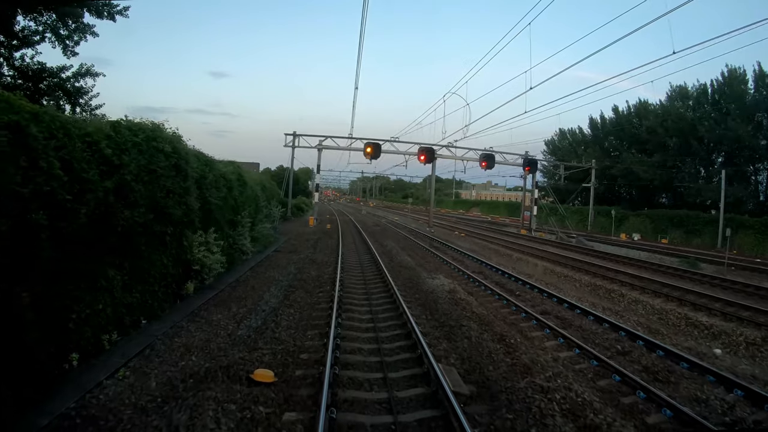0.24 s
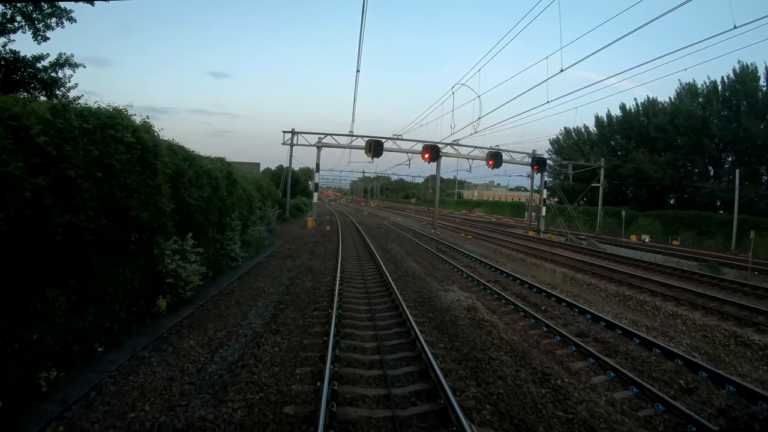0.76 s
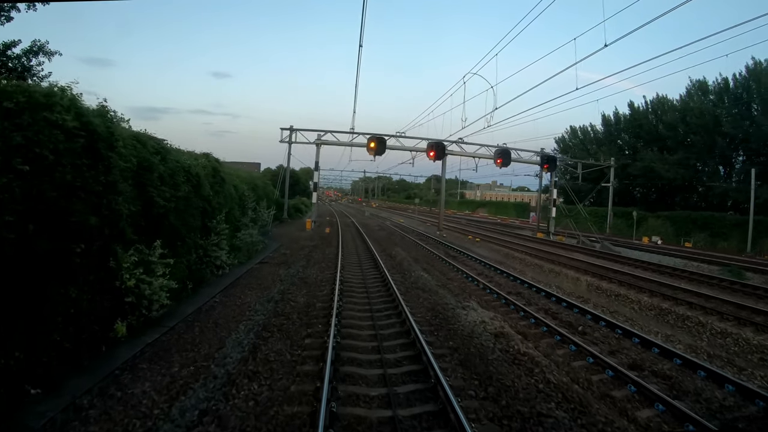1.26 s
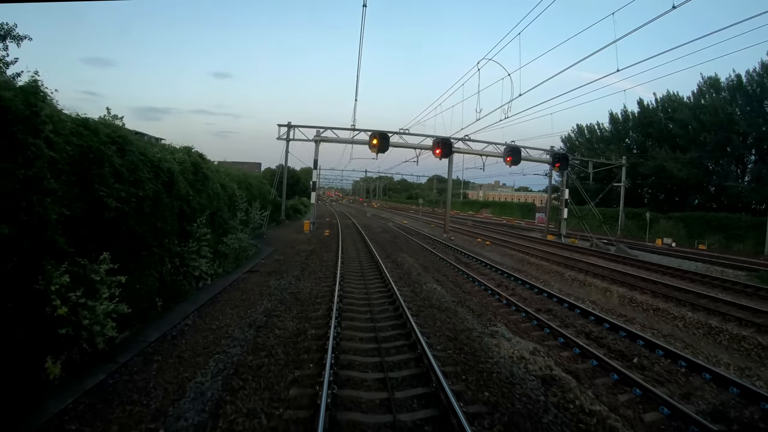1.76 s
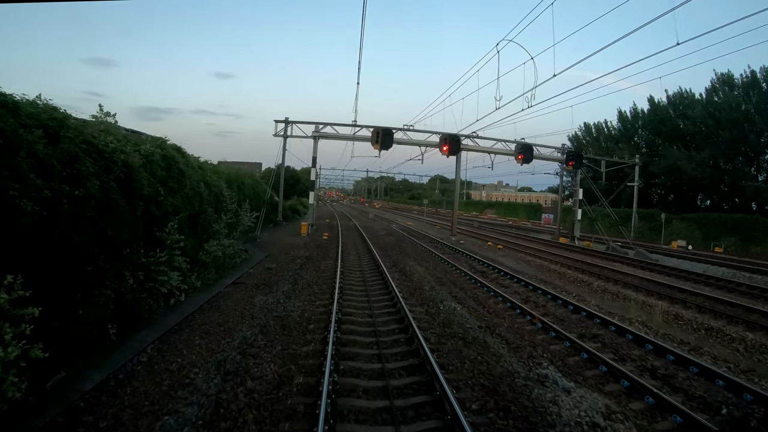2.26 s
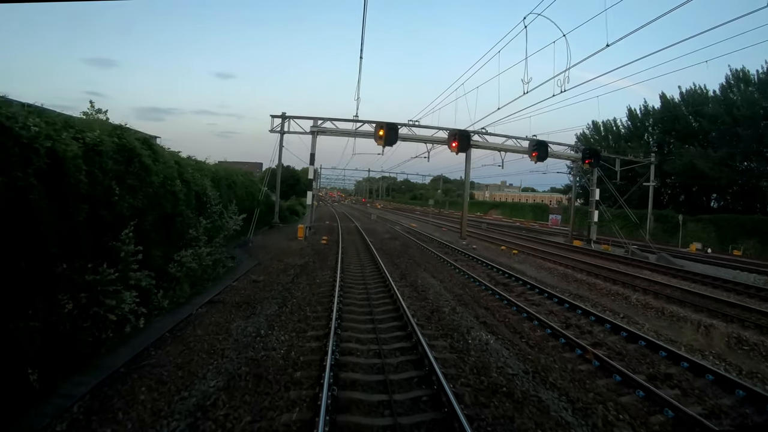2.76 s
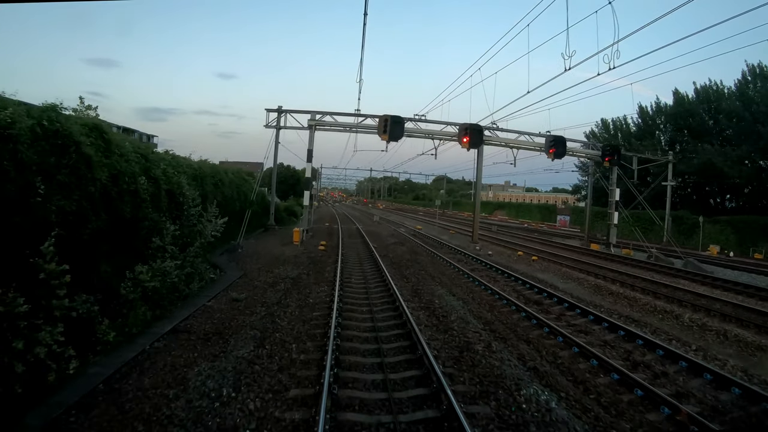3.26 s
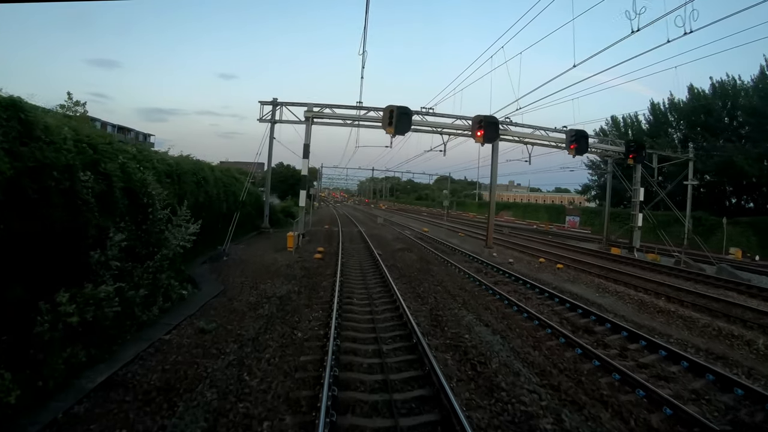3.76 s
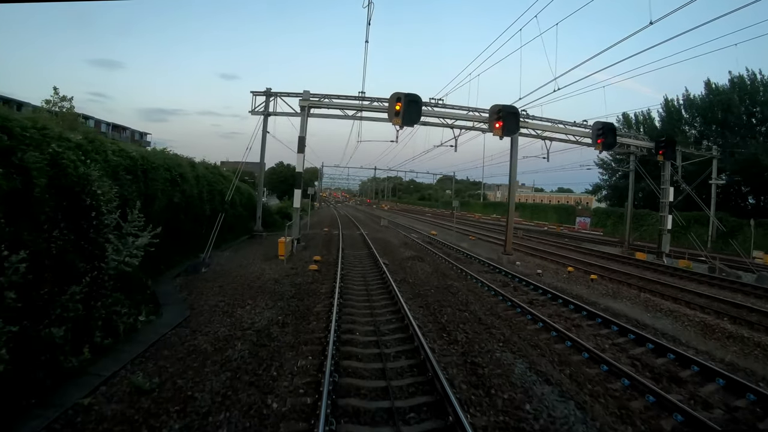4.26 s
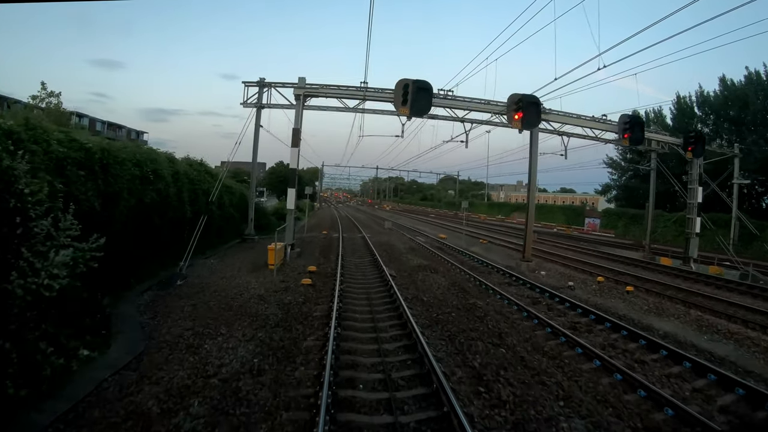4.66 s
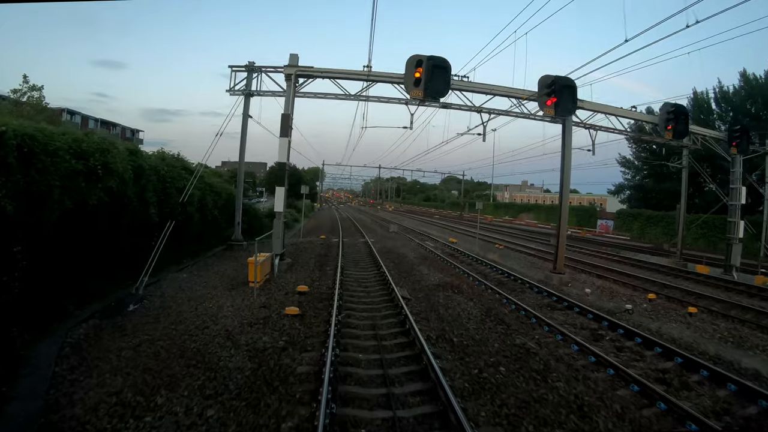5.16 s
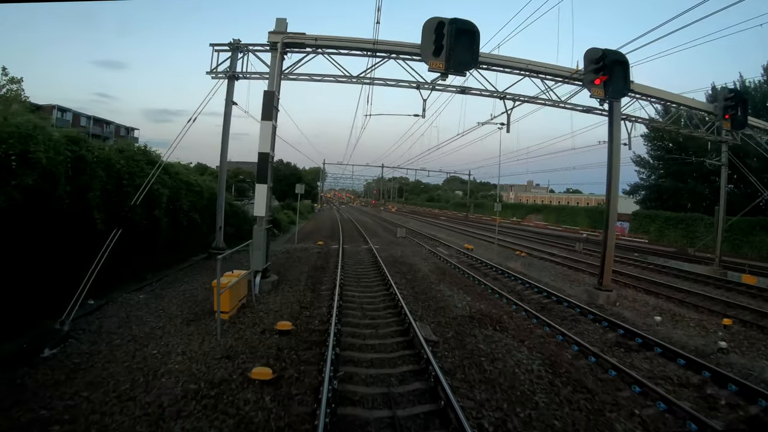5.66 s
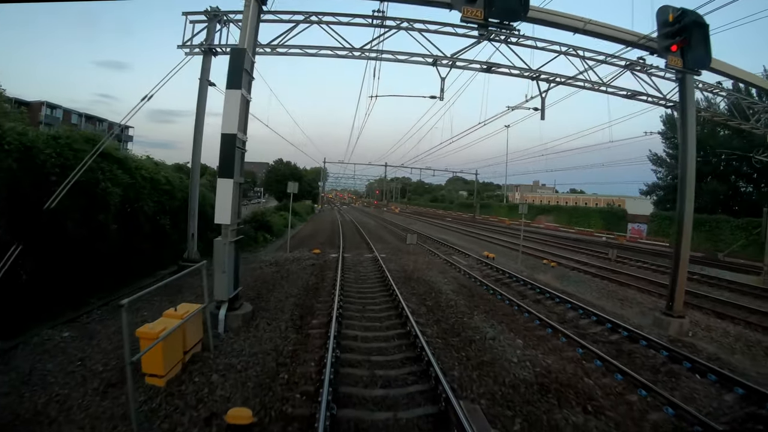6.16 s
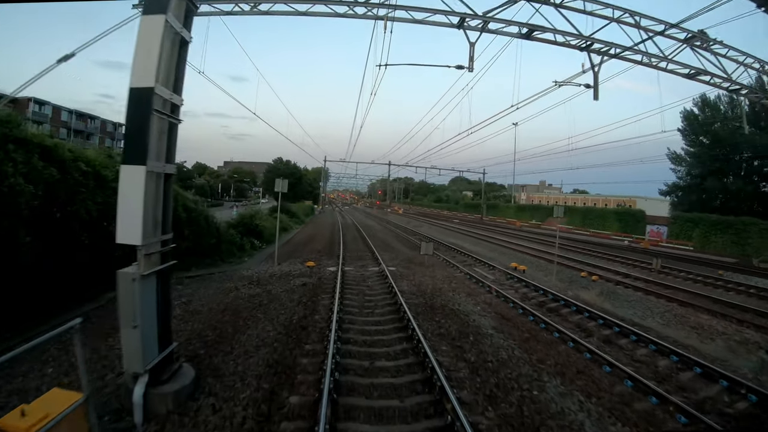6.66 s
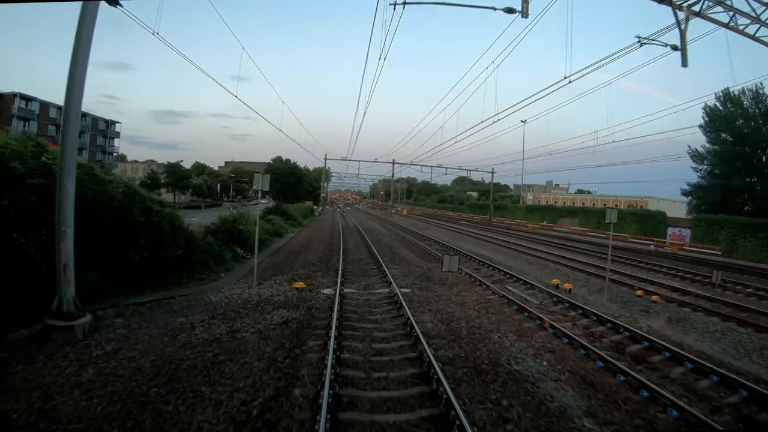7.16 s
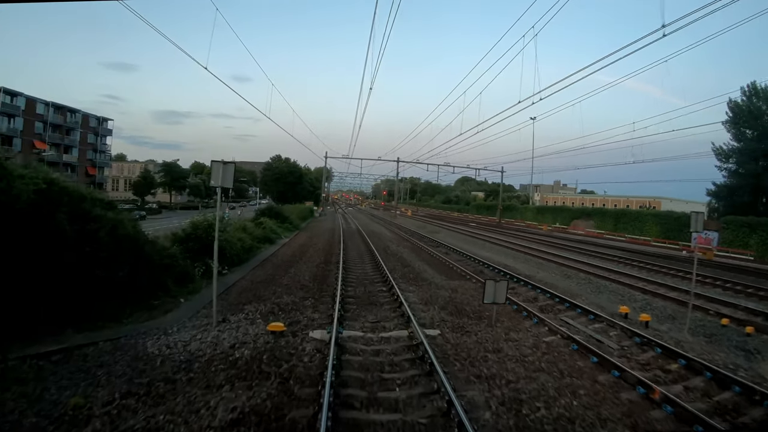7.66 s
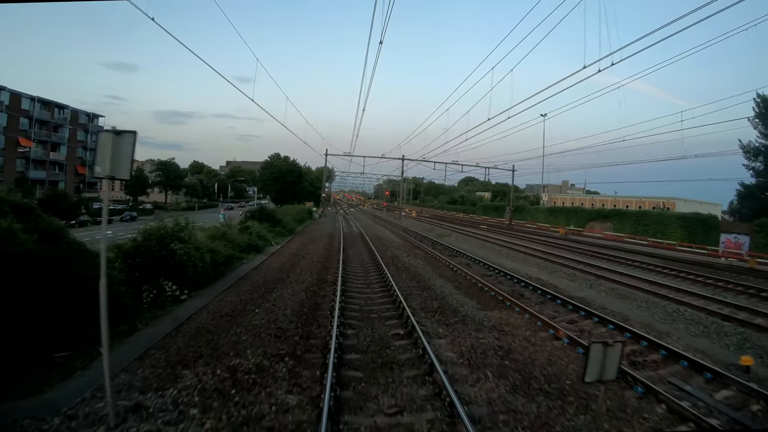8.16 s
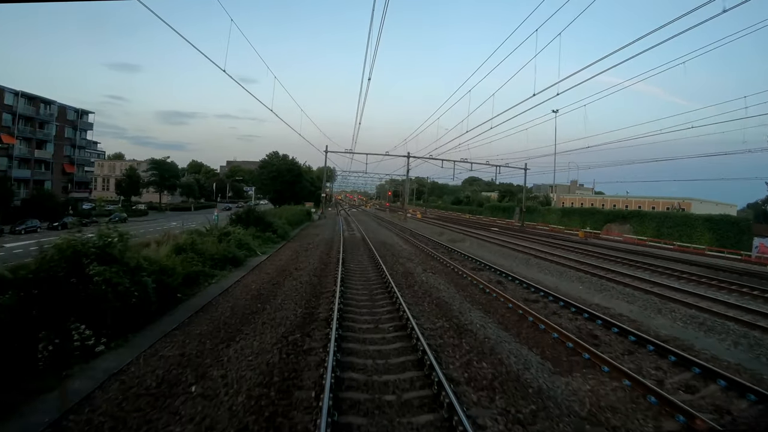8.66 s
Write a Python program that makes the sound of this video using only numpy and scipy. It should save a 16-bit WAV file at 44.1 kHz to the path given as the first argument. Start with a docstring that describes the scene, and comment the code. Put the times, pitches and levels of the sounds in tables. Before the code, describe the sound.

A close stereo microphone in a train driver's cab catches low rumbling through the floor as speed slowly builds. A metallic lever scrapes, clacks hard twice with a brief springy ring, and ticks through four notches. Then only rolling remains: throbbing bass surges, droning panels, a faint rising whine, a few dull knocks and tiny bright ticks over gently growing rail hiss.

```python
"""Inside the cab of a train that slowly gathers speed: from the start wheels rumble through the floor
(coloured noise), the car body booms (a wavering sine) and panels and floor drone (narrow-band noise).
In the first second a control lever slides and is thrown twice (dense impacts through ringing modes); it
then clicks over four notches (single impacts), and the small cab answers each. Later gears whine faintly
on climbing tones, rail joints knock, faint bright ticks sound, and the rail hiss has grown by the end."""
import sys
import numpy as np
from scipy import signal
from scipy.fft import rfft, irfft
from scipy.io import wavfile
from scipy.ndimage import uniform_filter1d

SR = 44100
rng = np.random.default_rng(int(sys.argv[2]) if len(sys.argv) > 2 else 0)


def dump(signal):
    """Clip the signal to [-1, 1] and save it as 16-bit WAV at the path in sys.argv[1]."""
    limited = np.clip(np.atleast_2d(signal).T, -1, 1)
    pcm = np.round(limited * 32767).astype(np.int16)
    wavfile.write(sys.argv[1], SR, pcm)


N = 393372


def undb(db):
    """Decibel law: level in dB to amplitude gain."""
    return 10 ** (np.asarray(db) / 20)


def curve(rows, column=1):
    """Linear interpolation: one column of a table over time."""
    rows = np.asarray(rows, float)
    return np.interp(np.arange(N) / SR, rows[:, 0], rows[:, column])


def on_hz(table, size):
    """Spectral envelope: (frequency, level) points joined over log frequency at every bin."""
    hz, db = np.transpose(table)
    bins_hz = np.fft.rfftfreq(size, 1 / SR)
    return np.interp(np.log(bins_hz + 1), np.log(hz), db)


def walk(rate):
    """Random modulation: levels held 1 / rate s and smoothed twice, standard deviation 1."""
    step = 32  # samples between computed points
    hold = int(SR / rate / step)
    levels = np.repeat(rng.standard_normal(N // step // hold + 2), hold)
    levels = uniform_filter1d(uniform_filter1d(levels, hold), hold)
    return np.interp(np.arange(N) / step, np.arange(len(levels)), levels / np.std(levels))


def swell(start_s, length_s):
    """Raised-cosine envelope: a smooth rise and fall, peak 1, half height for half its length."""
    return np.sin(np.pi * np.clip((np.arange(N) / SR - start_s) / length_s, 0, 1)) ** 2


def fade(t60, seconds=1.):
    """Exponential decay: damping takes away 60 dB in t60 seconds."""
    return np.exp(-np.log(1000) * np.arange(int(seconds * SR)) / SR / t60)


# Diffuse field at two close ports: frequency_hz, side_minus_mid_db
PORT_WIDTH = [(60, -15.5), (110, -24), (190, -20), (330, -10), (580, -5.5), (1020, 1), (1800, -2),
              (3180, -4.5), (5610, -0.5), (9900, -0.5)]
# Balance of the two ports: frequency_hz, left_minus_right_db
PORT_LEAN = [(60, 0), (110, 0.0), (190, 0.0), (330, 0.5), (580, 2), (1020, -1), (1800, -1.5), (3180, 0),
             (5610, -0.5), (9900, -1)]


def diffuse(colour, size=N):
    """Diffuse field: coloured noise, mid rms 1, with ports alike in the bass and unlike in the treble."""
    mid, side = rfft(rng.standard_normal((2, size))) * undb(on_hz(colour, size))
    side = side * undb(on_hz(PORT_WIDTH, size))
    lean = undb(on_hz(PORT_LEAN, size) / 2)
    pair = irfft(np.array([(mid + side) * lean, (mid - side) / lean]), size)
    return pair / np.std(pair.mean(axis=0))


def narrow(hz, width, rough=1e3):
    """Narrow-band noise: a carrier with a random complex envelope, mid rms about 1, ports drifting in phase."""
    wobble = (1 + rough * (walk(width) + 1j * walk(width))) / np.sqrt(1 + 2 * rough ** 2)
    carrier = np.exp(2j * np.pi * np.cumsum(hz * np.ones(N)) / SR)
    band = np.sqrt(2) * wobble * carrier
    difference = min(np.mean(hz) / 1100, 1) * walk(9) * band.imag
    return band.real + np.array([[1], [-1]]) * difference


def tone(hz, gain):
    """Phase integration: a sine on a moving pitch; gain is its rms."""
    return np.sqrt(2) * gain * np.sin(2 * np.pi * np.cumsum(hz) / SR)


def ring(modes, bend=0., settle_s=1., spread=1.6):
    """Modal synthesis: decaying sines, each with its own phase at each port; the pitch may start sharp."""
    t = np.arange(SR) / SR
    t = t + bend * settle_s * (1 - np.exp(-t / settle_s))
    response = 0
    for hz, db, t60 in modes:
        phase = rng.uniform(0, 2 * np.pi) + rng.uniform(0, spread, (2, 1))
        response = response + undb(db) * fade(t60) * np.sin(2 * np.pi * hz * t + phase)
    return response


def echo(colour, t60, rise_s):
    """Reverberation: the cab answers one impact with diffuse sound that builds up and dies."""
    half = SR // 2
    envelope = fade(t60) * (1 - fade(rise_s * np.log(1000)))  # rise_s is a time constant
    tail = diffuse(colour, size=half) * envelope[:half]
    return np.pad(tail, ((0, 0), (0, SR - half)))


def hits(events):
    """Impulsive excitation: one single-sample force for each (start_s, level_db)."""
    force = np.zeros(N)
    for s, db in events:
        force[int(s * SR)] = undb(db)
    return force


def play(force, response):
    """Linear superposition: a force convolved with an impulse response."""
    first, last = np.flatnonzero(force)[[0, -1]]
    sound = signal.fftconvolve(force[None, first:last + 1], response, axes=1)[:, :N - first]
    return np.pad(sound, ((0, 0), (first, N - first - sound.shape[1])))


# Lever rattle, a slide and then two throws, each a list of: time_s, force_level_db
LEVER_RATTLE = [
    [(0, -81), (.115, -75), (.135, -64), (.16, -70.5), (.2, -70), (.30, -70.5)],
    [(.303, -66.5), (.311, -47), (.32, -46), (.335, -41), (.355, -32.5), (.375, -40), (.43, -54.5),
     (.47, -65.5), (.6, -92)],
    [(.614, -59), (.619, -41), (.626, -31), (.645, -33), (.658, -39.5), (.671, -40.5), (.677, -37),
     (.684, -36), (.697, -34), (.712, -46), (.74, -48), (.78, -60.5), (.83, -73.5), (.98, -82)],
]
# Cab colour for the slide and each throw: frequency_hz, relative_level_db_per_hz
LEVER_COLOUR = [
    [(400, -2), (700, -4), (1300, -11), (2700, -19.5), (4500, -33), (7500, -33), (10000, -43), (12000, -69)],
    [(150, -2), (300, 1), (450, -14), (570, -1), (690, -3.5), (830, -10.5), (940, -5), (1030, -9),
     (1150, -17), (1550, -10), (2400, -13.5), (3000, -16.5), (3900, -24.5), (4800, -35.5), (7100, -25),
     (10300, -42.5), (10900, -51.5), (15000, -68)],
    [(180, -25), (390, 2), (510, -5.5), (660, 2), (780, -8.5), (1000, -2.5), (1350, -6.5), (1620, -3.5),
     (2350, -3.5), (3000, -9), (3900, -17), (4800, -28.5), (7600, -27), (10300, -39.5), (10900, -58),
     (15000, -57)],
]
# Modes of the lever and desk plate: frequency_hz, relative_level_db, t60_s
LEVER_MODES = [(395, -24, .2), (668, -20, 0.2), (889, -25, 0.2), (1005, -24, 0.16), (1210, -25, 0.34),
               (1360, -22, 0.25), (1730, -22, 0.19), (2325, -21, 0.2), (2407, -22, .2), (2550, -30, 0.27),
               (2843, -23, 0.2), (3180, -29, .25), (1935, -22, .24), (3870, -30, .2), (5790, -36, .2)]
# Modes of the lever spring: frequency_hz, level_db, t60_s
SPRING_MODES = [(1215, -58, 2.0), (2205, -55.5, 1.5), (2232, -61, .8), (3870, -70, .8), (4110, -78, 1.2),
                (5780, -76, .7)]
# Lever spring: struck_s, stopped_s
SPRING_TIMES = (.37, .62)


def throws():
    """Random impact train: impacts shared at random among several cab echoes, all ringing one set of modes."""
    echoes, impacts_per_s, cab_t60_s = 6, 4500, 0.15
    t, out, modes = np.arange(N) / SR, 0, ring(LEVER_MODES)
    for rows, colour, ring_db in zip(LEVER_RATTLE, LEVER_COLOUR, (-20, -3, 4)):
        chance = rng.random((3, N))
        rattle = (chance[0] < impacts_per_s / SR) * (2 * chance[1] - 1)
        force = rattle * (t > rows[0][0]) * (t < rows[-1][0]) * undb(curve(rows))
        chosen_echo = (chance[2] * echoes).astype(int)
        for number in range(echoes):
            response = echo(colour, cab_t60_s, 0.00027) + undb(ring_db) * modes
            out = out + play(force * (chosen_echo == number), response)
    struck_s, stopped_s = SPRING_TIMES
    spring = play(hits([(struck_s, 0)]), ring(SPRING_MODES)) * (t < stopped_s)
    return out + spring


# Catch dropping into each notch: start_s, impact_level_db
NOTCH_HITS = [(.89, -43.5), (1.04, -40.5), (1.163, -39), (1.342, -38.5)]
# Cab colour after a notch: frequency_hz, relative_level_db_per_hz
NOTCH_CAB_COLOUR = [(500, 0), (700, 7), (950, -1), (1400, -5.5), (1750, -2), (2000, 3), (2300, 1),
                    (2550, -10), (3300, -13.5), (4600, -25), (7500, -33), (10000, -43)]
# Modes of the spring catch, before it seats: frequency_hz, relative_level_db, t60_s
CATCH_MODES = [(1728, -8.5, 0.45), (1785, -17, .2), (2050, -17, 0.1), (2280, -17, .08), (950, -18, .2),
               (1235, -22, 0.3)]


def notches():
    """Damped modal ringing: the spring catch starts sharp, slackens, and is damped as it seats."""
    free_s, sharpness, settle_s = 0.077, 0.3, 0.008  # sharpness is a fraction of the pitch
    t = np.arange(SR) / SR
    damping = undb(-1600 * np.maximum(t - free_s, 0))  # 1600 dB per s once seated
    seat = (1 - fade(0.06)) ** 2 * damping
    catch = seat * ring(CATCH_MODES, sharpness, settle_s, spread=.8)
    out = 0
    for notch in NOTCH_HITS:  # a fresh cab response for each
        cab = undb(-4.0) * echo(NOTCH_CAB_COLOUR, 0.26, 0.018)
        out = out + play(hits([notch]), cab + catch)
    return out


# Car body boom between surges: time_s, pitch_hz, level_db before random dips
BODY_BOOM = [(0.0, 67.6, -46), (0.3, 63.76, -31), (.45, 56.53, -32.5), (.7, 62, -37), (1.0, 66.8, -33.5),
             (1.3, 51, -39.5), (2.0, 51, -42), (2.8, 50.93, -34), (2.95, 67.36, -35.5), (3.5, 67.16, -33.5),
             (3.65, 56.95, -28), (4.7, 59.8, -31), (4.95, 55.94, -23.5), (5.15, 66.25, -57), (5.4, 67, -24),
             (5.7, 64.1, -31), (5.93, 69.07, -44.5), (6.3, 66, -31), (6.8, 67.97, -26.5), (7.2, 63.5, -40),
             (7.5, 63.86, -36.5), (7.9, 66.43, -33.5), (8.1, 66.64, -29.5), (8.25, 67, -34.5),
             (8.45, 68.9, -28), (8.65, 59.3, -29), (8.92, 66.3, -33)]
# Surges of the boom over rough track: centre_s, half_height_length_s, peak_rms_level_db
BOOM_SURGES = [(0.413, 0.22, -26.5), (0.715, 0.073, -21), (2.833, 0.12, -28.5), (4.324, 0.049, -23.5),
               (4.448, 0.08, -28), (4.58, 0.05, -26), (4.746, 0.066, -25), (5.026, 0.074, -20),
               (5.384, 0.071, -26.5), (5.559, 0.1, -31), (5.771, 0.052, -22), (6.087, 0.15, -24),
               (6.613, 0.051, -27.5), (6.778, 0.053, -20.5), (7.067, 0.12, -25), (7.356, 0.12, -21.5),
               (7.642, 0.093, -16), (7.757, 0.036, -20)]


def boom():
    """Body resonance: a low sine of wavering pitch that dips at random and surges over rough track."""
    dip_db, flutter_per_s = 3, 12
    steady = undb(curve(BODY_BOOM, column=2) - dip_db * walk(flutter_per_s) ** 2)
    surges = sum(undb(db) * swell(s - length, 2 * length) for s, length, db in BOOM_SURGES)
    pitch_hz = curve(BODY_BOOM) * (1 + 0.0601 * walk(15))
    return tone(pitch_hz, np.maximum(steady, surges))


# Wheel rumble: time_s, level_db before flutter
WHEEL_LEVEL = [(0, -31), (.25, -35.5), (.5, -29.5), (1.0, -32.5), (1.8, -34), (2.3, -32), (3.0, -31.5),
               (3.6, -33), (4.0, -30.5), (5.0, -30), (5.24, -34), (5.45, -31), (6.5, -32), (7.5, -31.5),
               (8.55, -33.5), (8.69, -27.5), (8.92, -34.5)]
# Wheel rumble colour: frequency_hz, relative_level_db_per_hz
WHEEL_COLOUR = [(44, -31), (75, -7), (91, -6.5), (117, -5.5), (151, -8.5), (172, -15), (194, -11.5),
                (216, -17), (254, -19.5), (301, -33), (330, -37), (430, -62.5), (730, -120)]
# Bogie sway colour: frequency_hz, relative_level_db_per_hz
SWAY_COLOUR = [(11, -46), (18, -20), (30, -6.5), (48, 5.5), (62, 0.5), (78, -6.5), (100, -32.5), (200, -88)]


def rolling():
    """Broadband structure-borne excitation: fluttering wheel rumble over slower, deeper bogie sway."""
    flutter_db, flutter_per_s, sway_db = 1.6, 7.6, -35.5
    wheels = undb(curve(WHEEL_LEVEL) + flutter_db * walk(flutter_per_s)) * diffuse(WHEEL_COLOUR)
    sway = undb(sway_db + 0.68 * walk(0.5)) * diffuse(SWAY_COLOUR)
    return wheels + sway


# Floor resonances that the wheels shake for a while:
# start_s, length_s, centre_hz, half_amplitude_width_hz, peak_rms_level_db
FLOOR_DRONES = [(0, 0.43, 100.8, 4.3, -36), (1.604, 1.22, 150, 12, -39.5), (2.499, 1.16, 149.6, 2.7, -38.5),
                (2.007, 1.7, 102.3, 4.02, -42.5), (3.496, 3.9, 115.2, 4.9, -39.5),
                (3.997, 3.14, 184.6, 11.3, -41), (5.3, .5, 112, 9.4, -33.5), (7.7, 0.3, 150, 12, -39),
                (7.95, 0.35, 95.95, 20, -32), (8.22, .28, 96, 10, -32)]


def drones():
    """Resonant filtering: noise narrowed around floor resonances that come and go."""
    hz_axis, out = np.fft.rfftfreq(N, 1 / SR), 0
    for s, length, hz, width, db in FLOOR_DRONES:
        resonance = 1 / (1 + ((hz_axis - hz) / (width / 2)) ** 2)
        band = irfft(rfft(rng.standard_normal(N)) * resonance, N)
        out = out + undb(db) * swell(s, length) ** .5 * band / np.std(band)
    return out


# Wheels over rail joints: start_s, impact_level_db
JOINT_HITS = [(5.0, -54.5), (7.37, -57), (8.645, -43)]
# Cab colour after a joint: frequency_hz, relative_level_db_per_hz
JOINT_CAB_COLOUR = [(150, -4.5), (400, -3), (1000, -12), (2500, -30.5), (5000, -47.5), (7500, -40.5),
                    (10000, -61.5)]
# Modes of the floor panel: frequency_hz, relative_level_db, t60_s
FLOOR_MODES = [(89.8, 36, 0.33), (205.7, 14.5, 0.66), (253.4, 13, 0.51), (345, 4.5, .25)]
# Faint bright ticks, each with a short hissing tail: start_s, impact_level_db
TICK_HITS = [(4.92, -83.5), (5.6, -79.5), (8.38, -81.5)]
# Tick colour: frequency_hz, relative_level_db_per_hz
TICK_CAB_COLOUR = [(3500, -22), (5000, 2.5), (6500, 1.5), (7800, -7.5), (9500, -22)]


def joints():
    """Impulse response: rail joints knock softly through the floor modes; stray ticks excite bright noise."""
    floor = (1 - fade(0.17)) * ring(FLOOR_MODES).mean(axis=0)  # alike at both ports
    knock = echo(JOINT_CAB_COLOUR, 0.32, 0.033) + floor
    tick = echo(TICK_CAB_COLOUR, .5, 0.012)
    return play(hits(JOINT_HITS), knock) + play(hits(TICK_HITS), tick)


# Gear tones that surface while they cross a resonance of the body:
# start_s, length_s, starting_pitch_hz, peak_rms_level_db, roughness (ratio)
GEAR_WHINES = [(2.48, 0.36, 240, -39.5, .25), (2.9, .42, 251, -43, .25), (5.2, 1.45, 261, -50.5, .3),
               (8.05, 1.4, 372, -50.5, .25)]


def gears():
    """Climbing tones: each whine rises steadily, swells and fades, blurred in level and phase."""
    climb_hz_per_s, wander_per_s = 25, 18
    t, out = np.arange(N) / SR, 0
    for s, length, hz, db, rough in GEAR_WHINES:
        whine = narrow(hz + climb_hz_per_s * (t - s), wander_per_s, rough)
        out = out + whine * swell(s, length) ** 0.33 * undb(db)
    return out


# Cab panels that the rolling keeps ringing: centre_hz, envelope_rate_per_s, level_db before swells
CAB_PANELS = [(393, 40, -66), (478, 35, -67), (564, 31, -74), (631, 50, -70), (714, 30, -76),
              (807, 45, -80.5), (1020, 25, -82.5), (1070, 37, -82.5), (1333, 66, -81.5)]
# A climbing band of rail noise:
# start_s, length_s, starting_hz, climb_hz_per_s, envelope_rate_per_s, peak_rms_level_db
SINGING_RAIL = (5, 5, 1006.5, 35, 60, -75.5)


def panels():
    """Sustained resonance: each panel swells on its own; a band of rail noise climbs through them."""
    swell_db, swell_per_s = 2.5, 4
    s, length, hz, climb, rate, db = SINGING_RAIL
    rail_band = narrow(hz + climb * (np.arange(N) / SR - s), rate)
    out = undb(db) * swell(s, length) ** .5 * rail_band
    for hz, rate, db in CAB_PANELS:
        out = out + undb(db + swell_db * walk(swell_per_s)) * narrow(hz, rate)
    return out


# Rail hiss colour: frequency_hz, relative_level_db_per_hz
RAIL_COLOUR = [(160, -31), (280, -8.5), (348, -8.5), (393, -5), (464, -7), (524, -12), (618, -12),
               (667, -21), (698, -17.5), (752, -24.5), (799, -20), (973, -24.5), (1330, -25), (1700, -45.5),
               (2210, -69), (3740, -120)]
# Upper hiss colour: frequency_hz, relative_level_db_per_hz
UPPER_COLOUR = [(880, -28.5), (1500, -1.5), (1720, -7), (1940, -7.5), (2100, -6.5), (2360, -11.5),
                (2550, -10), (2760, -13.5), (3020, -17), (3500, -19), (4550, -46.5), (7700, -120)]
# Rough spots where the hiss swells: centre_s, half_height_length_s, rail_lift_db, upper_lift_db
ROUGH_SPOTS = [(1.89, 0.055, 0, 5), (5.02, 0.093, 3.5, 2.5), (5.453, 0.098, 2.5, 3.5), (7.395, 0.12, 1, 5),
               (8.435, .15, 1.5, 3), (8.703, 0.075, 6, 3)]


def rail_hiss():
    """Roughness noise: two bands of hiss that grow as the train gathers speed and lift over rough spots."""
    rail_db, rail_db_per_s = -54, 0.2866
    upper_db, upper_db_per_s = -79.5, 1
    t = np.arange(N) / SR
    rail_lift_db, upper_lift_db = sum(np.outer(lift_db, swell(s - length, 2 * length))
                                      for s, length, *lift_db in ROUGH_SPOTS)
    rail_level_db = rail_db + rail_db_per_s * t + rail_lift_db + 1.6 * walk(9.3)
    upper_level_db = upper_db + upper_db_per_s * t + upper_lift_db + 0.91 * walk(5.5)
    return undb(rail_level_db) * diffuse(RAIL_COLOUR) + undb(upper_level_db) * diffuse(UPPER_COLOUR)


# Air noise colour: frequency_hz, relative_level_db_per_hz
AIR_COLOUR = [(1880, -27.5), (3200, -2), (3570, 0), (3860, -0.5), (4150, -3.5), (4300, -2), (5630, -7.5),
              (7270, -5.5), (9060, -13.5), (9810, -24), (10400, -28.5), (11200, -51.5), (13500, -58.5),
              (22000, -120)]


def air():
    """Broadband noise: a faint, nearly steady treble of air."""
    return undb(-83.5 + .6 * walk(4.5)) * diffuse(AIR_COLOUR)


# Hum of electrical gear: pitch_hz, peak_level_db before random dips
ELECTRIC_HUM = [(888, -71), (2256, -83), (2466, -84.5), (2643, -94.5), (2875, -91), (3698, -99),
                (4107, -89.5)]


def hum():
    """Phase modulation: faint sines of electrical gear that waver in phase and dip at random."""
    t, out = np.arange(N) / SR, 0
    for hz, db in ELECTRIC_HUM:
        gain = undb(db - 3.9 * walk(2.3) ** 2)
        phase = 2.6 * walk(7.6) + rng.uniform(0, 2.0, (2, 1))
        out = out + gain * np.sin(2 * np.pi * hz * t + phase)
    return out


def scene():
    """Superposition: every source in the cab adds linearly."""
    lever = throws() + notches()
    running = boom() + rolling() + drones() + joints() + gears()
    background = panels() + rail_hiss() + air() + hum()
    return lever + running + background


def record(dry):
    """Low-pass filtering: a steep elliptic filter removes the treble above 15.5 kHz."""
    return signal.sosfilt(signal.ellip(8, .2, 60, 15500, fs=SR, output="sos"), dry)


dry = scene()
out = record(dry)
dump(out)
```